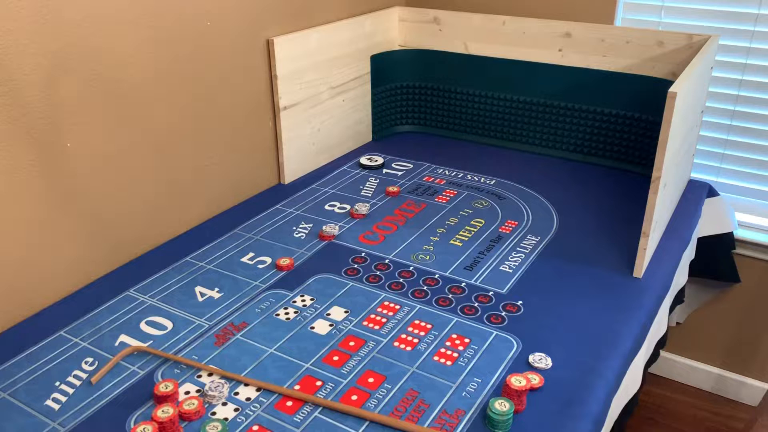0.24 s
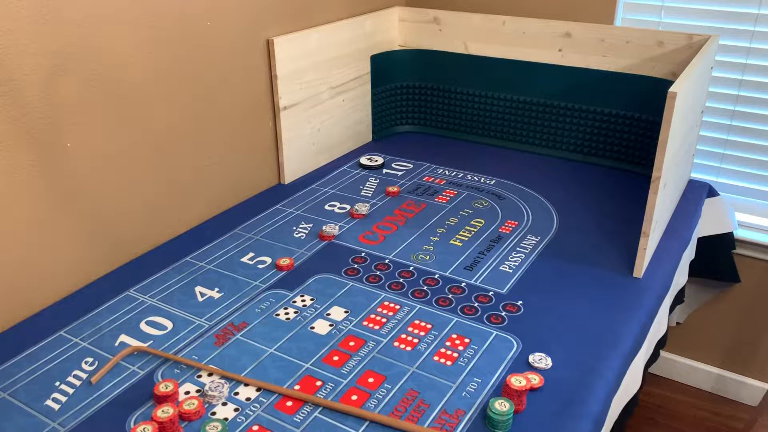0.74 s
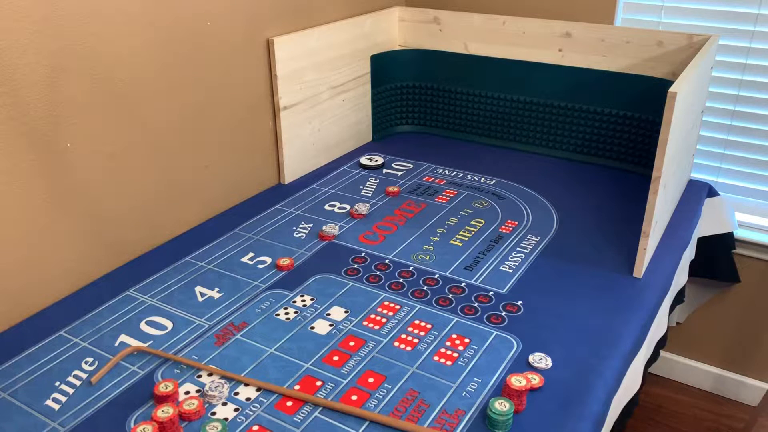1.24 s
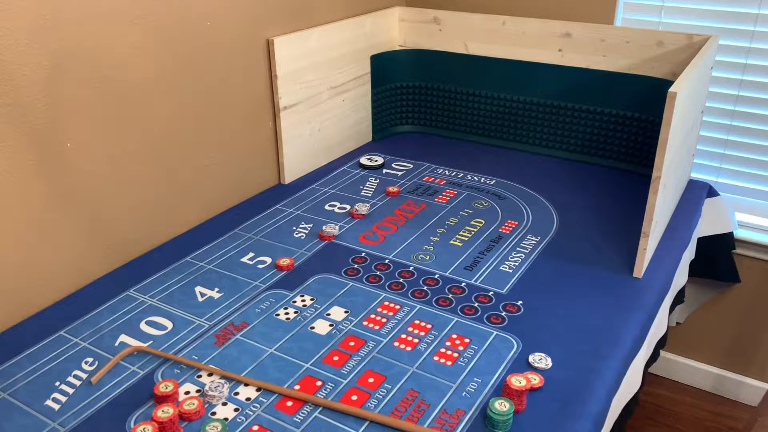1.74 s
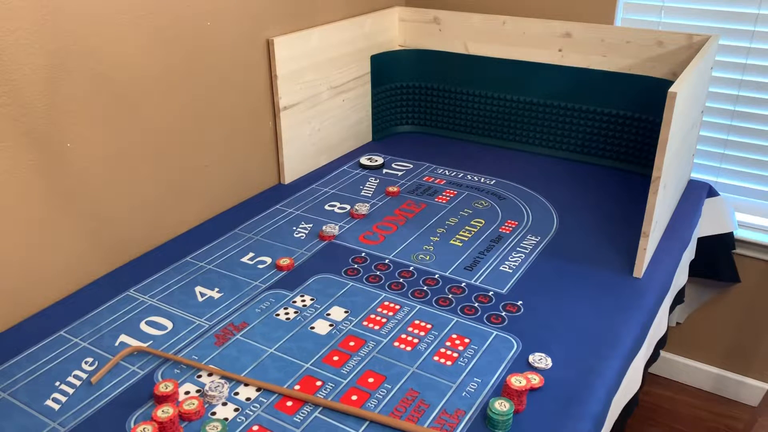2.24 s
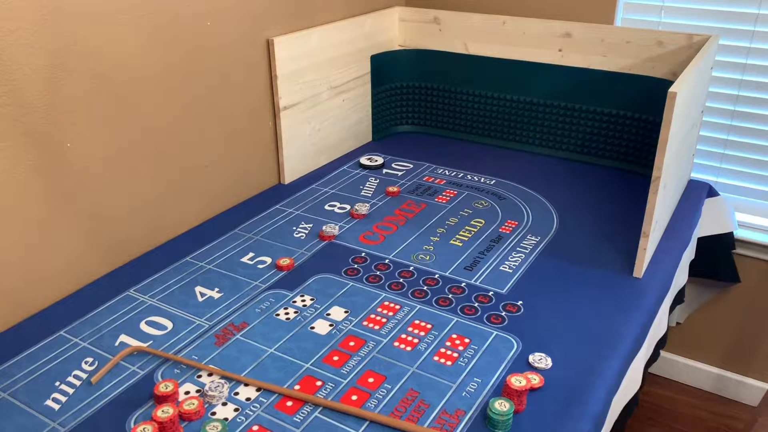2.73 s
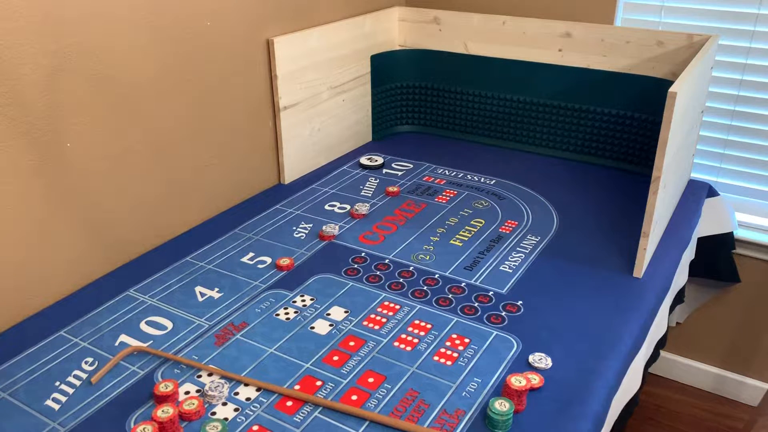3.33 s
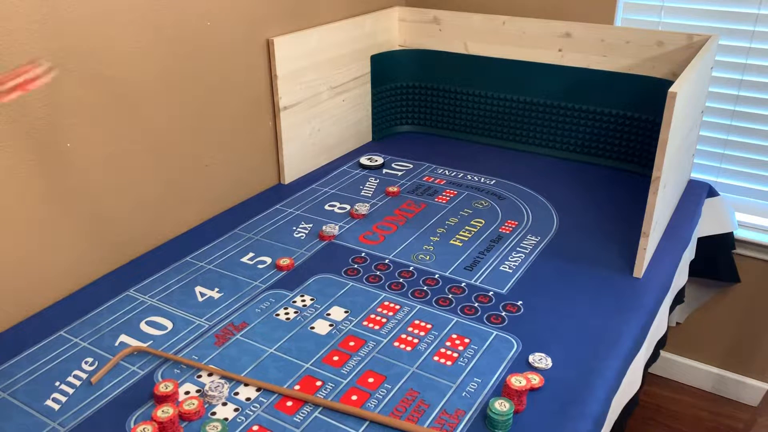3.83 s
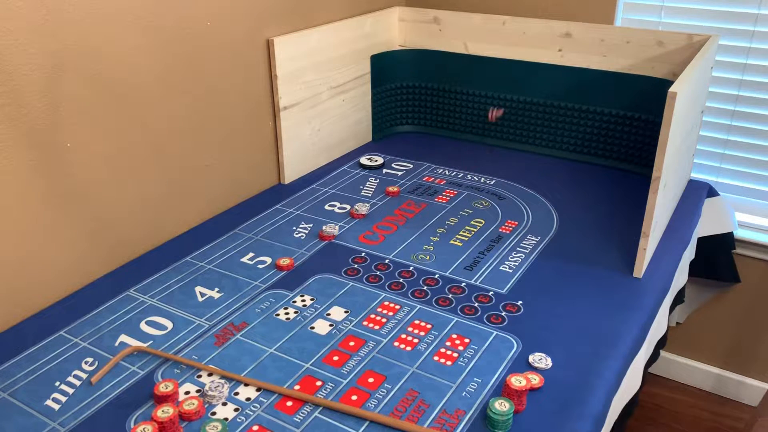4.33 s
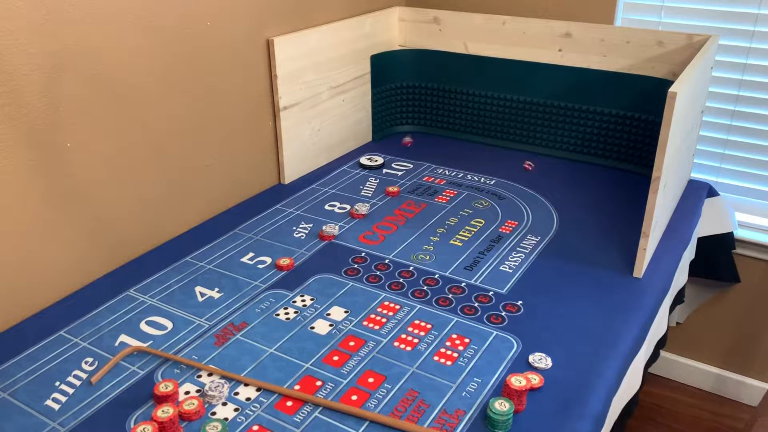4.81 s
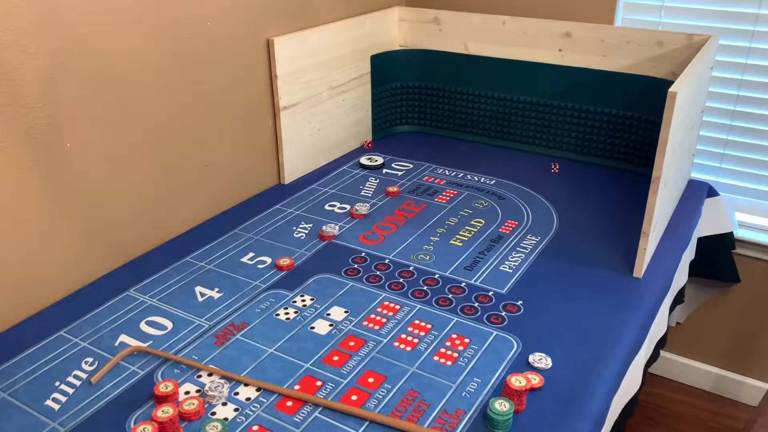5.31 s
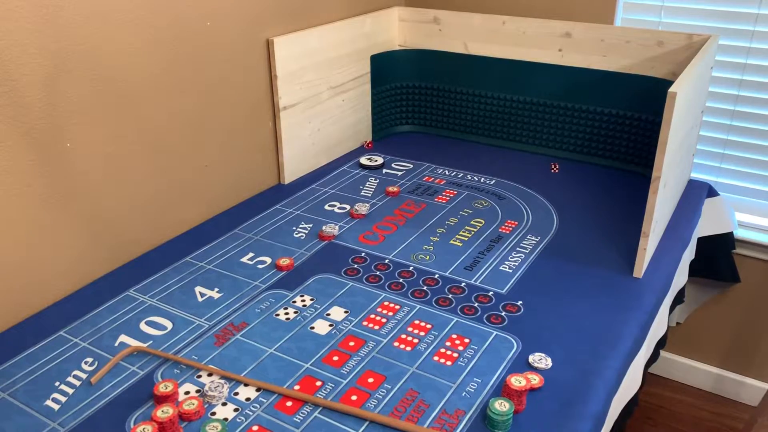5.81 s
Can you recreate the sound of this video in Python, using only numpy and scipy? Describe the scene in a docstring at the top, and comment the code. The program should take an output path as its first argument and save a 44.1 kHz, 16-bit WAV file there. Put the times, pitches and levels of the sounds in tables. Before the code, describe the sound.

Dice click lightly in a hand, then land with loud knocks on a felt-covered board and chatter against wood, with low microphone bumps and rustling.

```python
"""Two dice thrown on a felt-covered board

Two dice click in the hand, land on the board and chatter against its wooden surround in a bare room.
Each blow is a tiny burst of contacts ringing a set of resonances, with wall echoes and a fading tail.
Clothes rustle and faint creaks sound, made from shaped noise; single threads snag as high clicks.
Air pushed at the microphone heaves, thumps and flutters as low noise, with sudden pressure drops."""
import sys
import numpy as np
from scipy import signal
from scipy.fft import rfft, irfft
from scipy.io import wavfile
from scipy.ndimage import uniform_filter1d

SR = 44100
rng = np.random.default_rng(int(sys.argv[2]) if len(sys.argv) > 2 else 0)


def generate_wav(sig):
    """Save sig (samples, or channels by samples) to the path in sys.argv[1] as 16-bit PCM at SR."""
    pcm = np.round(np.clip(np.atleast_2d(sig).T, -1, 1) * 32767).astype(np.int16)
    wavfile.write(sys.argv[1], SR, pcm)


N = 267273  # length in samples


def amp(db):
    """Turn decibels into a gain."""
    return 10 ** (np.asarray(db) / 20)


def rms_one(x):
    """Scale a sound to an rms (average strength) of 1."""
    return x / np.sqrt(np.mean(x ** 2) + 1e-20)


def in_time(rows):
    """Join the points of each curve by straight lines, one value per sample."""
    start_s, *columns = np.transpose(rows)
    return [np.interp(np.arange(N) / SR, start_s, column) for column in columns]


def at_hz(points, hz):
    """Read a curve over pitch, with pitch spaced by octaves as the ear hears it."""
    points_hz, values = np.array(points).T
    return np.interp(np.log(hz), np.log(points_hz), values)


def band(x, low_hz, high_hz):
    """Keep only the sound between two pitches."""
    edges_hz = [low_hz, min(high_hz, SR * 9 / 20)]
    return signal.sosfilt(signal.butter(2, edges_hz, "band", fs=SR, output="sos"), x)


def coloured(spectrum):
    """Noise of rms 1 with the given spectrum, silent up to its first pitch."""
    hz = np.maximum(np.arange(N // 2 + 1) * SR / N, 1)
    gain = amp(at_hz(spectrum, hz)) * (hz > spectrum[0][0])
    return rms_one(irfft(rfft(rng.standard_normal(N)) * gain, N))


def steady(noise, softness):
    """Even out the height of a noise's swings but keep their wandering pace."""
    swing = signal.hilbert(noise)
    height = np.abs(swing)
    return rms_one(swing.real / (height + abs(softness)))


def resonate(x, hz, width_hz):
    """A two-pole resonance applied twice: gain 1 on top, steep skirts, a rounded attack."""
    radius = np.exp(-np.pi * abs(width_hz) / SR)
    angle = 2 * np.pi * hz / SR
    feed = (1 - radius * radius) / 2
    stage = [feed, 0, -feed, 1, -2 * radius * np.cos(angle), radius * radius]
    return signal.sosfilt([stage, stage], x + 1e-18)


def struck(blows, modes, spread_db, scatter_s):
    """Each blow is a brief scatter of contacts ringing every mode; harder ones favour the upper modes.

    Returns the direct sound and three room feeds, as neighbouring modes radiate in different directions."""
    size = SR // 5
    t = np.arange(size) / SR
    out = np.zeros((4, N + size))
    fade = np.exp(-t / scatter_s)
    click = np.arange(size) == 0
    for start_s, peak_db, hardness, room_share_db, contact_hz in blows:
        ring = np.zeros((4, size))
        for k, (hz, width_hz, level_db) in enumerate(modes):
            tilt_db = hardness * np.log2(hz / 1000)
            gain = amp(level_db + tilt_db + spread_db * rng.standard_normal())
            contacts = fade * rng.standard_normal(size)
            # even out how strongly the contacts drive this mode's pitch
            drive = np.abs(contacts @ np.exp(2j * np.pi * hz * t))
            contacts /= drive + np.linalg.norm(contacts) / 2
            ring[0] += gain * resonate(contacts, hz, width_hz)
            ring[1 + k % 3] += gain * resonate(click, hz, width_hz)
        # a soft contact dulls the whole blow
        dulling = signal.butter(4, min(contact_hz, SR * 9 / 20), fs=SR, output="sos")
        ring = signal.sosfilt(dulling, ring)
        ring[0] *= amp(peak_db) / np.abs(ring[0]).max()
        ring[1:] *= amp(peak_db + room_share_db - 29.5) / np.sqrt(np.mean(ring[1:] ** 2))
        at = round(start_s * SR)
        out[:, at:at + size] += ring
    return out[:, :N]


def room_hush():
    """The room's quiet, mostly low background noise, at one level throughout."""
    # spectrum of the hush: pitch_hz [Hz], level_db [relative dB per Hz]
    hush_spectrum = [(22, 1), (35, -7.5), (60, -17), (120, -17), (200, -22), (400, -23), (600, -24),
                     (1950, -36), (6100, -40), (15700, -45)]
    return amp(-67) * coloured(hush_spectrum)


def air():
    """Slow pressure swings of evened-out height; thumps and flutter ride on them and flare in each buffet."""
    # slow heave of air on the microphone: start_s [s], level_db [dB]
    draught = [(0.0, -25.5), (0.07, -37), (0.74, -45.5), (0.91, -38.5), (2.07, -47.5), (2.18, -38.5),
               (2.26, -39), (2.43, -21), (2.73, -48), (3.9, -30.5), (3.97, -48), (4.17, -35.5), (4.4, -32),
               (4.62, -11), (4.79, -23.5), (4.93, -10.5), (5.33, -18), (5.55, -24), (5.77, -21),
               (5.81, -30), (5.98, -18.5), (6.06, -31)]
    # buffets, short eddies hitting the microphone:
    # middle_s [s], length_s [s], thump_db [dB], flutter_db [dB]
    buffets = [(0.08, 0.1, -36, -85), (0.306, 0.42, -45.5, -96), (1.5, 0.034, -47, -70),
               (2.18, 0.12, -35.5, -64), (2.37, 0.073, -37, -45), (3.667, 0.16, -30, -57),
               (3.869, 0.07, -38, -63), (4.189, 0.16, -31.5, -58), (4.495, 0.032, -40, -52),
               (4.644, 0.039, -37, -33.5), (4.735, 0.025, -34, -41), (4.903, 0.056, -28, -49),
               (5.068, 0.14, -27.5, -43), (5.174, 0.038, -24, -39.5), (5.403, 0.033, -58, -80),
               (5.631, 0.022, -29.5, -56.5), (5.72, 0.059, -59, -51), (5.851, 0.12, -34.5, -71)]
    heave_db = uniform_filter1d(in_time(draught)[0], size=SR // 40)
    # levels at a heave of -35 dB, and how far they follow its swing (dB per dB)
    thump_gain = amp(-57 + 0.96 * (heave_db + 35))
    flutter_gain = amp(-68 + 0.51 * (heave_db + 35))
    for middle_s, length_s, thump_db, flutter_db in buffets:
        bell = np.exp(-2 * ((np.arange(N) / SR - middle_s) / (length_s / 2)) ** 2)
        thump_gain = thump_gain + amp(thump_db) * bell
        flutter_gain = flutter_gain + amp(flutter_db) * bell
    # spectra as (Hz, relative dB per Hz)
    heave = steady(coloured([(3, 6.5), (6, 9), (11, -1), (18, -30.0), (40, -70), (80, -110)]), .6)
    thump = steady(coloured([(18, 20.0), (30, -13.5), (50, -6.0), (75, -45.5), (200, -105.5)]), 0.48)
    flutter = coloured([(55, 6.5), (120, -5), (280, -13), (450, -31), (1200, -82)])
    return amp(heave_db) * heave + thump_gain * thump + flutter_gain * flutter


def slaps():
    """As an eddy breaks, the pressure falls within a few milliseconds and creeps back."""
    # sudden pressure drops: start_s [s], depth_db [dB, before the fall and recovery shape it]
    drops = [(2.163, -38), (2.383, -39.5), (2.414, -23.5), (3.686, -30.5), (4.458, -14.5), (5.376, -31),
             (5.622, -29), (5.759, -33)]
    fall_s, recover_s = .003, .011
    t = np.arange(SR // 5) / SR
    out = np.zeros(N + len(t))
    shape = (1 - np.exp(-(t / fall_s) ** 2)) * np.exp(-(t / recover_s) ** 2 / 2)
    for start_s, depth_db in drops:
        at = round(start_s * SR)
        out[at:at + len(t)] -= amp(depth_db) * shape
    return out[:N]


def rustle():
    """Cloth fibres slip in dense grains of uneven size, bunched into short swishes, over a dull shuffle."""
    # loudness of the clothes: start_s [s], bright_swish_db [dB, before bunching], dull_shuffle_db [dB]
    cloth_levels = [(0, -100, -100), (1.8, -100, -78.5), (2.27, -101, -69.5), (2.4, -75, -67.5),
                    (2.49, -94, -72), (3.2, -100, -92), (3.4, -89, -82.5), (3.62, -77, -69.5),
                    (3.69, -79, -68), (3.74, -71, -67.5), (3.82, -76, -67.5), (3.9, -88, -71.5),
                    (4.1, -78.5, -69), (4.33, -80, -70), (4.45, -64, -54.5), (4.6, -61.5, -58),
                    (4.74, -66.5, -62.5), (4.87, -61, -69), (4.95, -67.5, -62), (5.05, -60, -60.5),
                    (5.15, -68.5, -60), (5.245, -67, -63), (5.28, -85, -65), (5.65, -77.5, -63.5),
                    (5.78, -70, -60.5), (6.06, -88, -60)]
    # spectrum of the bright swish: pitch_hz [Hz], level_db [relative dB per Hz]
    swish_spectrum = [(2000, -0.5), (4000, -58), (6000, -14), (8000, -7), (12000, -8), (15700, -9),
                      (16000, -32)]
    # spectrum of the dull shuffle: pitch_hz [Hz], level_db [relative dB per Hz]
    shuffle_spectrum = [(400, 9.5), (900, 7.5), (1400, 5), (2100, 0), (2900, -1), (4500, -4.5), (7000, -10),
                        (12000, -22.5)]
    bright_db, dull_db = in_time(cloth_levels)
    grains = np.repeat(amp(1.9 * rng.exponential(1, N // 64 + 2)), 64)[:N]
    # a new random height every 1300 samples, in dB
    knots = np.arange(N // 1300 + 2)
    swishes_db = np.interp(np.arange(N) / 1300, knots, rng.standard_normal(len(knots)))
    bright = amp(bright_db + swishes_db) * rms_one(coloured(swish_spectrum) * grains)
    return bright + amp(dull_db) * coloured(shuffle_spectrum)


def snags():
    """Single threads snag: lone clicks through one broad, high resonance."""
    # snagging threads: start_s [s], peak_db [dB]
    threads = [(2.3, -57), (3.537, -57), (5.209, -56), (5.233, -59), (5.353, -54), (5.521, -52.5),
               (5.737, -48), (5.851, -55), (5.863, -55), (5.898, -54)]
    pitch_hz, width_hz = 9500, 6900
    clicks = np.zeros(N)
    for start_s, peak_db in threads:
        clicks[round(start_s * SR)] = amp(peak_db)
    one_click_peak = np.abs(resonate(np.arange(99) == 0, pitch_hz, width_hz)).max()
    return resonate(clicks, pitch_hz, width_hz) / one_click_peak


def creaks():
    """Stuttering friction noise rings a resonance and another above it, starting quickly and fading."""
    # faint creaks: start_s [s], length_s [s, time constant of the fade], level_db [dB], pitch_hz [Hz]
    creak_rows = [(0.19, 0.13, -68.5, 930), (0.309, 0.19, -64.5, 930), (0.323, 0.14, -62, 380),
                  (0.606, 0.17, -66.5, 347), (0.892, 0.17, -59, 955), (0.932, 0.1, -64, 1360),
                  (1.416, 0.099, -70, 1260), (1.682, 0.076, -73, 1400), (1.887, 0.066, -66, 1450),
                  (2.38, 0.03, -64, 1200), (3.3, 0.056, -77.5, 2900), (3.45, 0.038, -78, 2900),
                  (3.71, 0.1, -72, 2900), (3.72, .08, -69, 830), (4.02, .1, -79, 2900)]
    sharpness = 4.8  # pitch divided by width
    overtone_ratio = 2.49  # upper resonance over pitch
    stutter_db = 3.5
    out = np.zeros(N)
    for start_s, length_s, level_db, hz in creak_rows:
        age = np.arange(round(3 * length_s * SR)) / SR / length_s
        # the noise jumps to a new strength every 700 samples
        stutter = amp(stutter_db * rng.standard_normal(SR // 700 + 1))
        noise = rng.standard_normal(SR) * np.repeat(stutter, 700)[:SR]
        rub = rms_one(resonate(noise, hz, hz / sharpness))
        overtone = rms_one(resonate(noise, hz * overtone_ratio, hz * 2 / sharpness))
        # the overtone weakens by 13 dB per octave of pitch above 1 kHz
        rub += amp(-11 - 13 * max(np.log2(hz / 1000), 0)) * overtone
        envelope = np.minimum(5 * age, 1) * np.exp(-age ** 2)
        at = round(start_s * SR)
        out[at:at + len(age)] += amp(level_db) * envelope * rub[-len(age):]
    return out


def close_ticks():
    """Sharp ticks close by: short contacts ringing broad, quickly dying resonances."""
    # ticks: start_s [s], peak_db [dB], hardness [dB per octave], room_share_db [relative dB],
    # contact_low_pass_hz [Hz]
    tick_blows = [(4.295, -43.5, -6.8, -1, 12000), (5.9357, -14.5, 9, -12.5, 16000),
                  (5.9368, -16.5, 5, -20, 16000), (5.9425, -34, -5, -21, 16000),
                  (5.9465, -25.5, -2, -13, 3850), (5.9533, -16.5, -0.5, -15.5, 3260),
                  (5.997, -33.5, -7, -24, 1790)]
    # resonances of the ticks: pitch_hz [Hz], width_hz [Hz], level_db [relative dB]
    tick_modes = [(830, 1100, -7), (1270, 1000, -8), (2255, 1100, -12), (2900, 640, -3), (3755, 1150, -2),
                  (4530, 870, 1.5), (5500, 750, -19), (8880, 3000, -28.5)]
    return struck(tick_blows, tick_modes, spread_db=1.5, scatter_s=.0009)


def panel_raps():
    """A die chatters against a thin wooden panel, each rap ringing the panel's resonances."""
    # raps: start_s [s], peak_db [dB], hardness [dB per octave], room_share_db [relative dB],
    # contact_low_pass_hz [Hz]
    rap_blows = [(5.122, -23.5, -7, -10, 2500), (5.1255, -16, -3.5, -3.5, 3260),
                 (5.132, -16.5, 4.5, -2, 4500), (5.143, -19, -0.5, -9, 5570), (5.154, -22.5, 0, -4.5, 4920),
                 (5.16, -18.5, -4.5, -8.5, 3500)]
    # resonances of the panel: pitch_hz [Hz], width_hz [Hz], level_db [relative dB]
    panel_modes = [(470, 460, -10.5), (823, 192, 2.5), (1074, 240, -9.5), (1400, 380, -5), (1690, 730, -15),
                   (2236, 260, -4.5), (2830, 450, -17.5), (4300, 1800, -38)]
    return struck(rap_blows, panel_modes, spread_db=1.5, scatter_s=.002)


def dice_clicks():
    """Dice click together in the hand, each click ringing the dice's resonances."""
    # clicks: start_s [s], peak_db [dB], hardness [dB per octave], room_share_db [relative dB],
    # contact_low_pass_hz [Hz]
    click_blows = [(.101, -50.5, -10.5, -5, 6000), (.5583, -19, -4.5, -3.5, 8500),
                   (1.111, -45, -5.5, -2.5, 5030), (1.19, -56.5, 4, -4, 3330),
                   (1.577, -52.5, -11, -3, 4020), (2.118, -29.5, -3, -5, 3300), (2.134, -37, -9, -4, 4800)]
    # resonances of the dice: pitch_hz [Hz], width_hz [Hz], level_db [relative dB]
    dice_modes = [(380, 480, -26), (627, 84, -25), (930, 202, -6), (1388, 277, -6.5), (1960, 300, -19.5),
                  (2090, 870, -7.5), (2660, 410, -10.5), (3500, 3500, -15.5), (4500, 4700, -38.5),
                  (6000, 360, -17.5), (7740, 310, -20.5), (12500, 2500, -23)]
    return struck(click_blows, dice_modes, spread_db=1, scatter_s=.0008)


def board_knocks():
    """Dice land on the felt-covered board, each knock ringing the board's mostly low resonances."""
    # knocks: start_s [s], peak_db [dB], hardness [dB per octave], room_share_db [relative dB],
    # contact_low_pass_hz [Hz]
    knock_blows = [(4.313, -22, 7, 2, 12000), (4.3152, -2.5, -1.5, -6, 6000), (4.3215, -.5, 0, -6, 16000),
                   (4.43, -21, 2.5, -2, 4000), (4.499, -24, 7, -3.5, 3300), (4.6385, -18, -9, -4.5, 700),
                   (4.654, -31.5, 14, 1, 820), (4.7345, -11.5, -7, -6, 2960), (4.7465, -19, 1.5, 0, 1390),
                   (5.684, -36.5, -1.5, 1, 860), (5.709, -42, -2, -14, 1200)]
    # resonances of the board: pitch_hz [Hz], width_hz [Hz], level_db [relative dB]
    board_modes = [(153, 68, -5), (295, 207, 5), (523, 110, 1.5), (578, 255, -0.5), (790, 380, -1),
                   (1053, 190, -4), (1200, 250, -3.5), (1450, 440, -8), (1790, 550, -12.5),
                   (2305, 610, -17), (3500, 520, -43), (6950, 12000, -59), (13000, 10000, -64)]
    return struck(knock_blows, board_modes, spread_db=1.5, scatter_s=.001)


def room(x):
    """A few wall echoes, and a diffuse tail that builds up and dies band by band."""
    # time the tail takes to drop by 60 dB: pitch_hz [Hz], decay_s [s]
    decay_times = [(120, 0.73), (320, 0.63), (840, 0.66), (2200, 0.58), (5800, 0.45), (12000, 0.43)]
    # echoes of the first walls: late_s [s], level_db [dB]
    wall_echoes = [(0.012, -17), (0.031, -11), (.044, -11)]
    t = np.arange(SR) / SR
    edges_hz = 80 * 2 ** np.arange(0, 8.1, .5)  # half-octave bands
    white = rng.standard_normal((2, SR))
    tail = np.zeros(SR)
    for k, (low_hz, high_hz) in enumerate(zip(edges_hz, edges_hz[1:])):
        decay_s = at_hz(decay_times, np.sqrt(low_hz * high_hz))
        # neighbouring bands use different noise
        tail += band(white[k % 2], low_hz, high_hz) * amp(-60 * t / decay_s)
    tail = amp(-28.5) * tail * (1 - np.exp(-t / 0.0013))
    for late_s, level_db in wall_echoes:
        tail[round(late_s * SR)] += amp(level_db) * rng.choice([-1, 1])
    return signal.fftconvolve(x, tail)[:N]


def scene():
    """Add up the blows, their sound in the room, the cloth, creaks, moving air and hush."""
    clicks, knocks, raps, ticks = dice_clicks(), board_knocks(), panel_raps(), close_ticks()
    direct = clicks[0] + knocks[0] + raps[0] + ticks[0]
    feeds = amp(-2.0) * clicks[1:] + amp(0.5) * knocks[1:] + amp(1.0) * raps[1:] + ticks[1:]
    wet = sum(room(feed) for feed in feeds)
    handling = snags() + creaks() + rustle()
    background = air() + slaps() + room_hush()
    return (direct + wet + handling + background)[None]


def record(dry):
    """The input fades in over 15 ms, peaks are rounded and the top above about 16 kHz is cut."""
    faded = dry * np.minimum(np.arange(N) / (.015 * SR), 1)
    rounded = 2.5 * np.tanh(faded / 2.5)
    top_cut = signal.cheby2(16, 40, 16300, fs=SR, output="sos")  # 40 dB down from 16300 Hz
    return signal.sosfilt(top_cut, rounded)


dry = scene()
out = record(dry)
generate_wav(out)
```